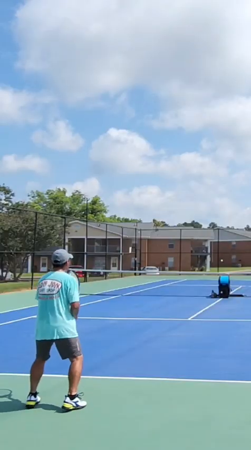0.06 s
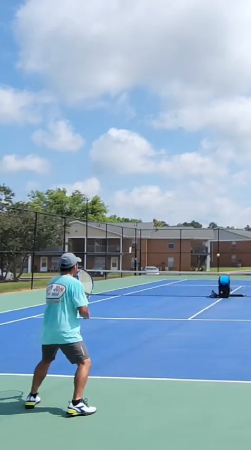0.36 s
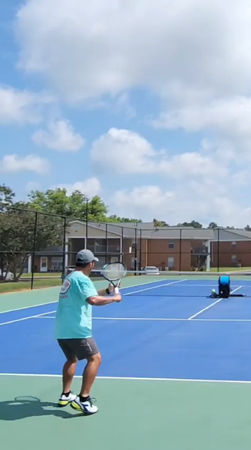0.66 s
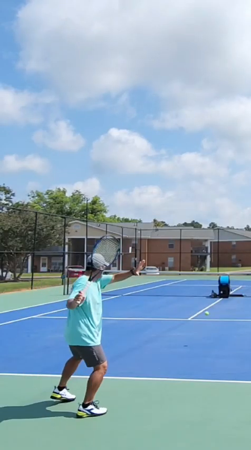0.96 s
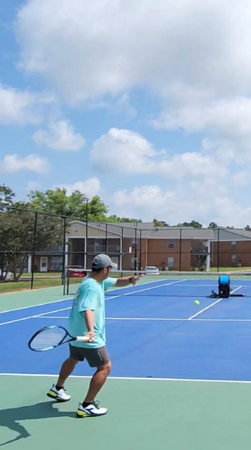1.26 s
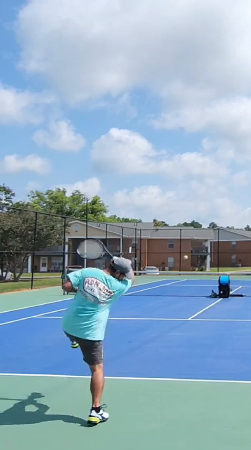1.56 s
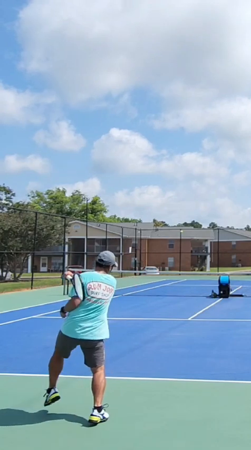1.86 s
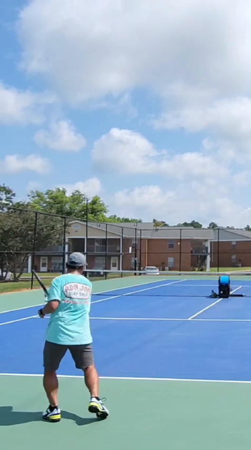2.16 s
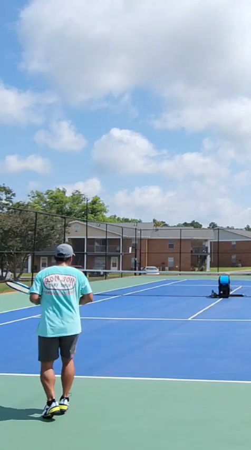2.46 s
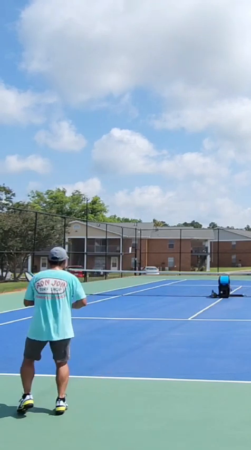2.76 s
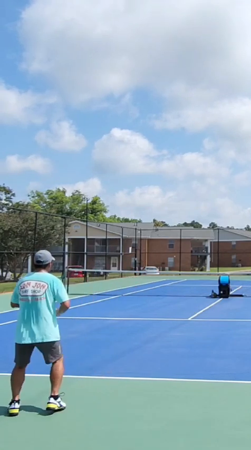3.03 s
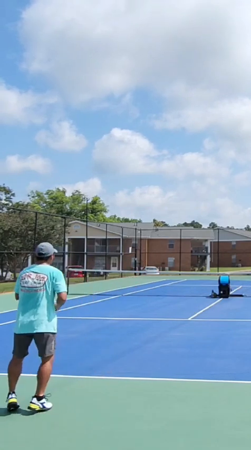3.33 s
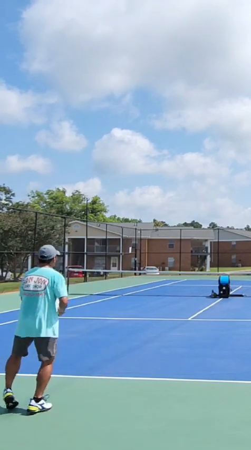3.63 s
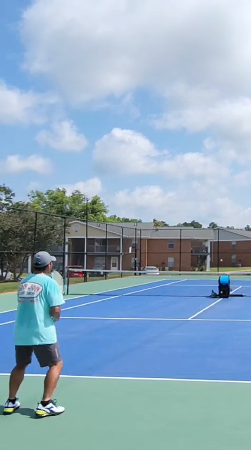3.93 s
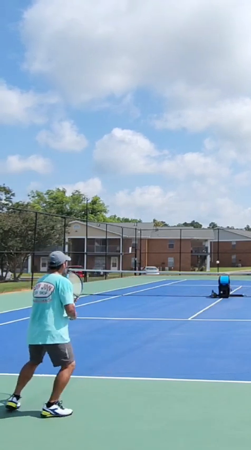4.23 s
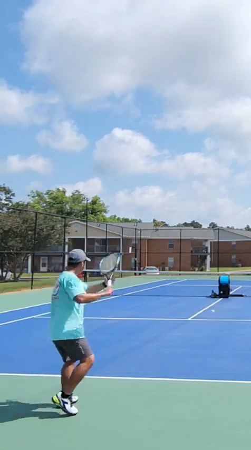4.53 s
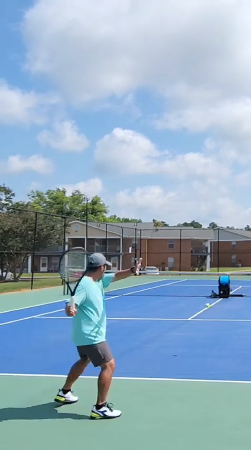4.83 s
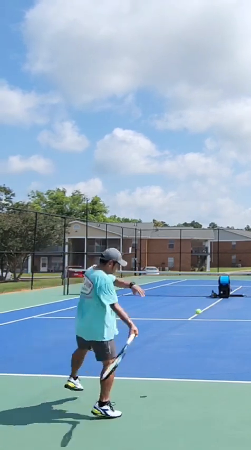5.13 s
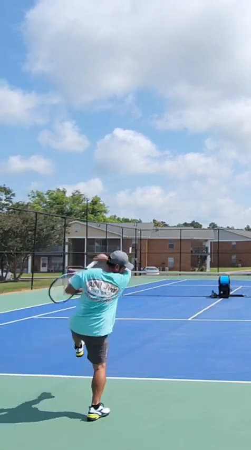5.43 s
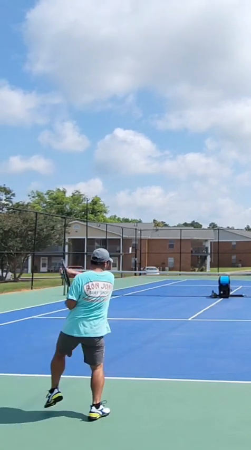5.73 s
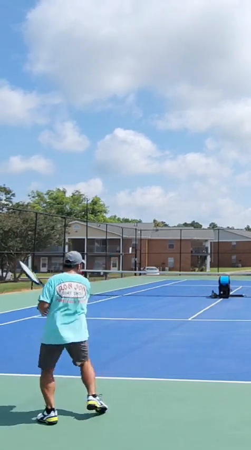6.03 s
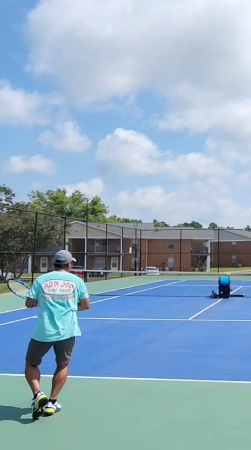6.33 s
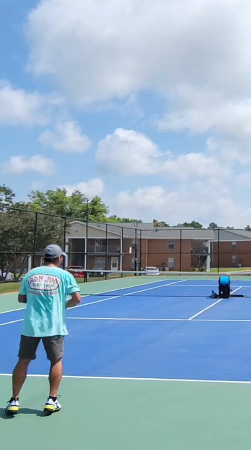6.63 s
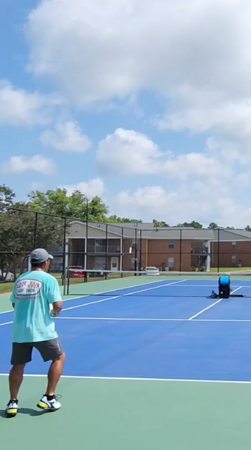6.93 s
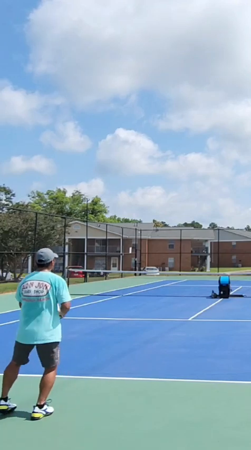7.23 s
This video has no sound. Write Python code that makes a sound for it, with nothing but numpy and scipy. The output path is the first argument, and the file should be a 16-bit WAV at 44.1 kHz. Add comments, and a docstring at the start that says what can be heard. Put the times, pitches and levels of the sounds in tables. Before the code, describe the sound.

Two sharp tennis racket hits pop on an outdoor court, with ball bounces, shoe scuffs and faint birdsong over a low hum.

```python
"""Forehands on an outdoor hard court

Two machine-fed tennis balls each bounce, then pop off the racket: a thump, the ring of the ball,
the ping of the strings and an echo from the fence. Shoes scuff over grit, a rubbed metal bar rasps,
birds whistle in the leaves, and two motors hum over the rumble of far traffic."""
import sys
import numpy as np
from scipy import signal
from scipy.fft import rfft, irfft
from scipy.io import wavfile

SR = 44100
rng = np.random.default_rng(int(sys.argv[2]) if len(sys.argv) > 2 else 0)


def wrap_up_sound(samples):
    """Save the sound to the file named by the first command line argument, as 16-bit audio."""
    columns = np.atleast_2d(samples).T
    # keep every value between -1 and 1, then stretch to whole-number steps
    tamed = np.clip(columns, -1, 1)
    steps = np.round(tamed * 32767).astype(np.int16)
    wavfile.write(sys.argv[1], SR, steps)


N = 321122
TIME = np.arange(N) / SR
FREQS = np.fft.rfftfreq(N, 1 / SR)


def from_db(db):
    """Decibels to gain."""
    return 10 ** (np.asarray(db) / 20)


def eq_curve(points):
    """Points of (freq_hz, level_db) as a gain per FFT bin, rolling off past both ends."""
    hz, db = np.transpose(points)
    f = FREQS + 1e-6
    rolloff = np.minimum(f / hz[0], 1) ** 3 * np.minimum(hz[-1] / f, 1) ** 3
    return from_db(np.interp(np.log(f), np.log(hz), db)) * rolloff


def noise(gain):
    """Noise of rms 1, shaped by a gain per bin."""
    x = irfft(rfft(rng.standard_normal(N)) * gain, N)
    return x / x.std()


def narrow_noise(hz, width_hz):
    """Noise in one resonance: a wavering tone, or a wobble when slow."""
    return noise(1 / (1 + ((FREQS - hz) / width_hz) ** 2))


def delayed(x, delay_s):
    """The same sound, later."""
    return np.interp(TIME - delay_s, TIME, x, left=0)


def since(start_s):
    """Seconds since a cue, held between 0 and 1."""
    return np.clip(TIME - start_s, 0, 1)


def swell(t, rise_s, order=2):
    """Grows to 1 at the rise time, then dies away; higher orders are tighter."""
    return (t / rise_s * np.exp(1 - np.minimum(t / rise_s, 50))) ** order


def ring(t, hz, t60_s):
    """A struck mode: a decaying sine."""
    return np.sin(2 * np.pi * hz * t) * np.exp(-np.minimum(np.log(1000) * t / t60_s, 50))


# Stereo tilt, with the high treble leaning left: freq_hz, left_minus_right_db
STEREO_TILT = [(10, -0.5), (600, 0.5), (1700, 2.5), (3000, 3), (4500, -4), (6000, 3.5), (7500, 12),
               (9000, 13.5), (10500, 5), (13000, 3), (15000, 0)]

def place(x, lead_samples):
    """Sound reaches the left channel first, and each side has its own colour."""
    lag = np.exp(-2j * np.pi * np.fft.rfftfreq(N) * lead_samples)
    tilt = np.sqrt(eq_curve(STEREO_TILT))
    return irfft(rfft(x) * np.array([tilt, lag / np.maximum(tilt, .1)]), N)


# Stereo width of the ambience: freq_hz, side_minus_mid_db
WIDTH = [(60, -21.5), (110, -19), (200, -14), (380, -6.5), (700, -1.5), (1290, 2), (2380, 0), (4400, -0.5),
         (8120, 0), (15000, -1.5)]

def wide_noise(spectrum):
    """Noise from all around: alike in the bass, unrelated in the treble."""
    mid, side = rfft(rng.standard_normal((2, N)))
    side *= eq_curve(WIDTH)
    x = irfft(eq_curve(spectrum) * np.array([mid + side, mid - side]), N)
    return x / x.mean(axis=0).std()


# Low, middle and high layers of the ambience bed: freq_hz, level_db
RUMBLE = [(12, -33), (20, -11), (70, 1.5), (119, -1), (145, -6), (179, -5.5), (203, -11.5), (242, -5),
          (264, -34), (289, -17), (400, -22.5), (520, -28.5), (880, -120)]
WASH = [(150, -41), (250, -1), (266, -7), (289, -9), (318, -14), (685, -11), (1540, -19), (1690, -22.5),
        (2000, -22.5), (3000, -34), (3900, -65), (6600, -120)]
HISS = [(1290, -28), (2200, -9), (2970, -5), (4310, -6.5), (5390, -8), (6640, -17.5), (7390, -12.5),
        (9330, -27), (14600, -26.5), (16000, -42)]
# Level of the hiss over time: time_s, level_db
HISS_LEVEL = [(0, -72), (2.6, -70), (3.3, -71), (7.28, -74)]

def open_air(rumble_db=-45.5, wash_db=-55.5):
    """Far traffic and leaves: a steady rumble and wash under a gently drifting hiss."""
    bed = from_db(rumble_db) * wide_noise(RUMBLE) + from_db(wash_db) * wide_noise(WASH)
    hiss_db = np.interp(TIME, *np.transpose(HISS_LEVEL))
    return bed + from_db(hiss_db) * wide_noise(HISS)


def motors(drone_hz=102, drone_db=-45, whine_db=-65.5, hum_hz=240, hum_db=-59):
    """One motor drones and whines, then fades away; a second hums throughout."""
    fade = from_db(-8 * np.maximum(TIME - 1.87, 0))   # 8 dB a second, from 1.87 s
    drone = from_db(drone_db) * np.sin(2 * np.pi * drone_hz * TIME + narrow_noise(5.9, 0.8))
    hum = from_db(hum_db) * np.sin(2 * np.pi * hum_hz * TIME + 0.75 * narrow_noise(5.7, 0.72))
    whine = from_db(whine_db) * narrow_noise(1680, 60)
    return fade * (drone + whine) + hum


def rub_envelope(start_s, length_s, attack_s=0.0044, release_s=0.02, linger_db=-5.5, fade_db_per_s=47):
    """A push on a bar: quick attack, hold, then a release that leaves a weak fading rub."""
    attack = np.clip((TIME - start_s) / attack_s, 0, 1)
    after = np.maximum(TIME - start_s - length_s, 0)
    linger = from_db(linger_db)
    release = (1 - linger) * np.exp(-after / release_s) + linger * from_db(-fade_db_per_s * after)
    return attack, release


# Rubs on a thin metal bar: start_s, length_s, friction_db, singing_over_friction_db
RUBS = [(0, 0.0099, -60.5, -5), (3.689, 0.011, -55.5, -9.5), (3.736, 0.085, -56.5, -13),
        (5.433, 0.15, -68, -3), (7.09, 0.059, -55.5, -1.5), (7.127, 0.081, -51.5, 0)]
# The bar's bending modes: pitch_hz, width_hz, hard_rub_db, pressure_slope_db_per_db
BAR_MODES = [(1471, 6.1, -10, -0.3), (4195, 26, -0.5, -0.05), (8040, 220, -10, 0), (12860, 320, -3, 0.5)]
# Friction hiss: freq_hz, level_db
FRICTION = [(1000, -2), (2800, 1), (4400, 7.5), (6000, 1.5), (8300, 0), (10000, -3.5), (13000, -7.5),
            (16000, -18)]

def metal_rasp(chatter_db=2.0, hard_rub_db=-46.5, singing_hold=0.44):
    """Uneven friction hisses and sets a bar singing, its top mode brighter under pressure."""
    friction = singing = np.full(N, 1e-9)
    for start_s, length_s, db, singing_db in RUBS:
        attack, release = rub_envelope(start_s, length_s)
        friction = np.maximum(friction, from_db(db) * attack * release)
        singing = np.maximum(singing, from_db(db + singing_db) * attack * release ** (1 - singing_hold))
    pressure_db = 20 * np.log10(friction) - hard_rub_db
    modes = sum(from_db(db + slope * pressure_db) * narrow_noise(hz, width_hz)
                for hz, width_hz, db, slope in BAR_MODES)
    chatter = from_db(chatter_db * narrow_noise(10, 21))
    hiss = friction * noise(eq_curve(FRICTION))
    return place(chatter * (singing * modes + hiss), lead_samples=2.7)


# Scuffs and footfalls: start_s, length_s, grit_db, heel_db
STEPS = [(0.042, 0.038, -55, -48.5), (0.494, 0.022, -58, -58), (0.791, 0.019, -36, -41),
         (1.501, 0.013, -44, -70), (1.562, 0.12, -55.5, -48), (1.807, 0.0061, -56, -45),
         (2.109, 0.036, -53, -44), (2.653, 0.023, -51, -70), (3.085, 0.0087, -58, -64),
         (3.817, 0.011, -46, -44), (4.052, 0.016, -45, -69), (4.656, 0.013, -48.5, -45.5),
         (4.708, 0.021, -60, -68), (4.967, 0.053, -61.5, -64), (5.309, 0.0076, -48, -70),
         (5.58, 0.014, -59, -47), (5.992, 0.029, -45.5, -55), (6.026, 0.014, -47.5, -80),
         (6.105, 0.09, -65.5, -62), (6.439, 0.018, -55, -46.5), (6.518, 0.014, -57, -68)]
# Bright grit and dull heel: freq_hz, level_db
GRIT = [(900, -5), (2500, -12), (3600, 9), (5300, 13.5), (7500, -4.5), (10000, -14), (12500, 1),
        (16000, -27)]
HEEL = [(80, -11), (250, 9), (650, 6), (1200, -3), (2500, -26), (5000, -34)]

def shoes(heel_rise_s=0.0049, grain_db=4.0, shuffle_db=-66, shuffle_count=10):
    """The sole lands with a pat and slides over grit; light shuffles fall at random."""
    slide = sum(from_db(db) * swell(since(start_s), length_s / 2) for start_s, length_s, db, _ in STEPS)
    shuffle_times = rng.uniform(0, N / SR, shuffle_count)
    slide += from_db(shuffle_db) * sum(swell(since(start_s), rise_s=0.0089) for start_s in shuffle_times)
    pat = sum(from_db(db) * swell(since(start_s), heel_rise_s, order=1) for start_s, _, _, db in STEPS)
    grains = noise(eq_curve(GRIT)) * from_db(grain_db * narrow_noise(160, 530))
    return place(slide * grains + pat * noise(eq_curve(HEEL)), lead_samples=5.07)


def trill(start_s=.123, end_s=1.72, period_s=.067, sweep_s=.026, low_hz=4400, high_hz=6000):
    """A bird's quick near-sine upsweeps, flickering on their way through leaves and air."""
    sweep = np.clip((TIME - start_s) % period_s / sweep_s, 0, 1) * (TIME > start_s) * (TIME < end_s)
    level_db = -61.5 + 4.5 * narrow_noise(34, 90)
    pitch_hz = (low_hz + (high_hz - low_hz) * sweep) * (1 + 0.0211 * narrow_noise(90, 85))
    tone = np.sin(2 * np.pi * np.cumsum(pitch_hz) / SR)
    return from_db(level_db) * np.sin(np.pi * sweep) ** .5 * tone


# Balls landing on the court or the far fence: start_s, level_db, crack_over_ring_db
BOUNCES = [(1.0443, -32.5, 2), (2.0211, -38, -23), (2.89, -38, -2), (4.8284, -30, 4), (5.79, -41.5, -22),
           (6.7932, -39, -5.5), (7.086, -44, -10)]
# Hollow ring of a bounce: pitch_hz, level_db, t60_s
BOUNCE_MODES = [(234, 1, 0.017), (1016, -15, 0.013), (1103, -2.5, 0.036), (1374, -12.5, 0.064),
                (1870, -28, 0.023)]
# Crack of the impact: freq_hz, level_db
CRACK = [(500, -53), (1400, 0), (2800, -9.5), (4500, -6), (8000, -22), (10000, -37), (15000, -47)]

def bounces(crack_rise_s=0.00035):
    """A sharp slap of air, then the short hollow ring of the ball."""
    out, slap = np.zeros(N), noise(eq_curve(CRACK))
    for start_s, db, crack_db in BOUNCES:
        t = since(start_s)
        shell = sum(from_db(mode_db) * ring(t, hz, t60_s) for hz, mode_db, t60_s in BOUNCE_MODES)
        burst = swell(t, crack_rise_s, order=1)
        crack = slap * burst * np.linalg.norm(burst) / np.linalg.norm(slap * burst)
        out += from_db(db) * (from_db(crack_db) * crack - shell)
    return place(out, lead_samples=2.75)


def sing(notes, start_s=0, level_db=0, stretch=1, waver=.02, flicker_db=3.0):
    """Each bird note swells and fades while its pitch bends through a wavering arc."""
    out = np.zeros(N)
    knots = np.linspace(0, 1, 12)
    for offset_s, length_s, start_hz, middle_hz, end_hz, db in notes:
        progress = np.linspace(0, 1, int(length_s * stretch * SR))
        pitch_hz = np.polyval(np.polyfit([0, .5, 1], [start_hz, middle_hz, end_hz], 2), progress)
        wobble, flicker = (np.interp(progress, knots, row) for row in rng.standard_normal((2, len(knots))))
        tone = np.sin(2 * np.pi * np.cumsum(pitch_hz * (1 + waver * wobble)) / SR)
        envelope = np.abs(np.sin(np.pi * progress)) ** .5
        at = int((start_s + offset_s * stretch) * SR)
        out[at:at + len(tone)] += from_db(level_db + db + flicker_db * flicker) * envelope * tone
    return out


# A songbird's phrase: offset_s, length_s, start_hz, middle_hz, end_hz, level_db
PHRASE = [(-.078, 0.03, 2110, 2390, 2850, -4.5), (-.018, .032, 3184, 4360, 3400, -1.5),
          (.007, .025, 3773, 3140, 3126, 3.5), (.061, .014, 5950, 5400, 4800, -2),
          (.09, 0.0517, 2686, 2227, 2210, -3.5)]
# Each repeat of the phrase: level_db
REPEATS = [-56.5, -52, -50, -53.5, -54.5, -52.5]
# Two notes of the phrase on their own: start_s, level_db, stretch_ratio
LONE_CHIRPS = [(3.008, -57.5, 0.81), (6.415, -59, 1.5), (6.943, -56.5, 1.7)]

def songbird(start_s=1.561, period_s=.2431, echo_s=.048, echo_db=-4):
    """A rolling song, its high notes repeated by a small reflector, then lone chirps."""
    song = sum(sing(PHRASE, start_s + k * period_s, db) for k, db in enumerate(REPEATS))
    high_notes = signal.sosfilt(signal.butter(4, 4000, "high", fs=SR, output="sos"), song)
    chirps = sum(sing(PHRASE[1:3], cue_s, db, stretch) for cue_s, db, stretch in LONE_CHIRPS)
    return song + from_db(echo_db) * delayed(high_notes, echo_s) + chirps


# A far bird's slurred whistles: start_s, length_s, start_hz, middle_hz, end_hz, level_db
SLURS = [(4.455, 0.061, 3400, 3420, 3320, -60), (4.535, 0.041, 3330, 3000, 2800, -63),
         (4.95, 0.042, 3260, 3070, 2930, -63), (5.03, .08, 2570, 2400, 2290, -64),
         (5.14, 0.085, 2850, 3050, 3300, -67), (5.52, 0.08, 3300, 3390, 3450, -62),
         (5.6, 0.12, 3320, 2530, 2920, -63.5)]

def birds(blur_db=-5, near_send_db=-11, far_send_db=-7):
    """One near bird and two far ones; leaves smear each note ahead of a longer tail."""
    near = place(songbird(), lead_samples=2.27)
    far = place(trill() + sing(SLURS), lead_samples=0.81)
    direct = near + from_db(-3) * far
    blur = from_db(blur_db) * scatter(direct, t60_s=0.088)
    tail = scatter(from_db(near_send_db) * near + from_db(far_send_db) * far, t60_s=0.7)
    return direct + blur + tail


# Racket hits: start_s, thump_db, thump_hz, ball_db, off_centre_ratio, felt_db, string_db, string_hz
STROKES = [(1.6378, -10, 215, -8.5, 0.07, -18.5, -37, 519), (5.4064, -9.5, 183, -9, 0.9, -19, -32, 521.5)]
# Ring of the ball leaving the strings: pitch_hz, clean_hit_db, off_centre_db
BALL_MODES = [(664, -24, -6), (831, 1, -1.5), (1090, -34, -18), (1530, -14, -11.5), (1837, -18, -13.5),
              (2250, -24.5, -14.5), (3190, -21.5, -17), (3900, -38, -14)]
# Ping of the string bed: pitch_ratio, level_db, t60_s
STRING_MODES = [(1.001, 6, 0.21), (2.14, -8, 0.12), (3.38, -9, 0.09), (4.2, -4, 0.075)]
# Felt brushing the strings: freq_hz, level_db
FELT = [(650, 13), (1500, 8), (2700, -5.5), (3800, -5), (5300, -3), (6400, -7), (8000, -8.5), (10000, -15),
        (12500, -10), (15000, -20)]

def forehands(dent_s=0.0049, thump_width_s=0.0024, release_s=0.002905, climb_per_s=0.23, flutter_db=-20):
    """The strings give and spring back, felt rubs over them, then ball and string bed ring."""
    pop, rub = np.zeros(N), np.zeros(N)
    for start_s, thump_db, thump_hz, ball_db, off_centre, felt_db, string_db, string_hz in STROKES:
        t = TIME - start_s - dent_s   # one push and pull of air around the deepest dent
        pop -= from_db(thump_db) * np.sin(2 * np.pi * thump_hz * t) * np.exp(-(t / thump_width_s) ** 2)
        free = since(start_s + release_s)
        for hz, clean_db, glancing_db in BALL_MODES:
            mode_db = ball_db + clean_db + off_centre * (glancing_db - clean_db)
            envelope = swell(free, .004 * (850 / hz) ** .4, order=6)   # higher modes peak and die sooner
            pop += from_db(mode_db) * envelope * np.sin(2 * np.pi * hz * free)
        glide = 1 + climb_per_s * free / 2   # the strings' pitch climbs as they settle
        for ratio, db, t60_s in STRING_MODES:
            pop -= from_db(string_db + db) * ring(free, ratio * string_hz * glide, t60_s)
        contact = swell(since(start_s), rise_s=.0021, order=3)
        flutter = from_db(flutter_db) * swell(since(start_s), rise_s=0.01, order=1)
        rub += from_db(felt_db) * (contact + flutter)
    return place(pop, lead_samples=3.35) + place(rub * noise(eq_curve(FELT)), lead_samples=2.49)


# Colour of the reverb tail: freq_hz, level_db
TAIL = [(150, -37), (500, -16), (1100, 8), (2000, 7.5), (4500, 7.5), (9000, 1.5), (16000, -15.5)]

def scatter(x, t60_s):
    """Fences and trees return a thin dying wash, different on each side."""
    response = np.array([noise(eq_curve(TAIL)) for _ in x]) * from_db(-60 * TIME / t60_s)
    response /= np.sqrt(np.sum(response ** 2, axis=1, keepdims=True))
    return signal.fftconvolve(x, response[:, :SR], axes=1)[:, :N]


# Slapback off the fence and houses: delay_s, level_db, pan_left_db
ECHOES = [(.0085, -28, 1.5), (0.0696, -16.5, 2), (0.084, -26, -5.5), (.168, -34, 3)]

def echoes(x, band_hz=(960, 1330)):
    """Separate reflections that return mostly the hollow middle of each pop."""
    mids = signal.sosfilt(signal.butter(2, band_hz, "band", fs=SR, output="sos"), x.mean(axis=0))
    return sum(from_db([[db + pan / 2], [db - pan / 2]]) * delayed(mids, delay_s)
               for delay_s, db, pan in ECHOES)


def scene(ground_db=-18.5, tail_db=-23.5):
    """Play on the court and its reflections, over birds and the ambience bed."""
    near = metal_rasp() + shoes() + forehands()
    play = near + bounces()
    ground = from_db(ground_db) * scatter(play, t60_s=.075)
    tail = from_db(tail_db) * scatter(play, t60_s=1.0)
    return play + ground + echoes(near) + tail + birds() + open_air() + motors()


def record(dry, cutoff_hz=15600):
    """A steep low-pass takes off the very top."""
    return signal.sosfilt(signal.ellip(10, .1, 80, cutoff_hz, fs=SR, output="sos"), dry)


dry = scene()
out = record(dry)
wrap_up_sound(out)
```